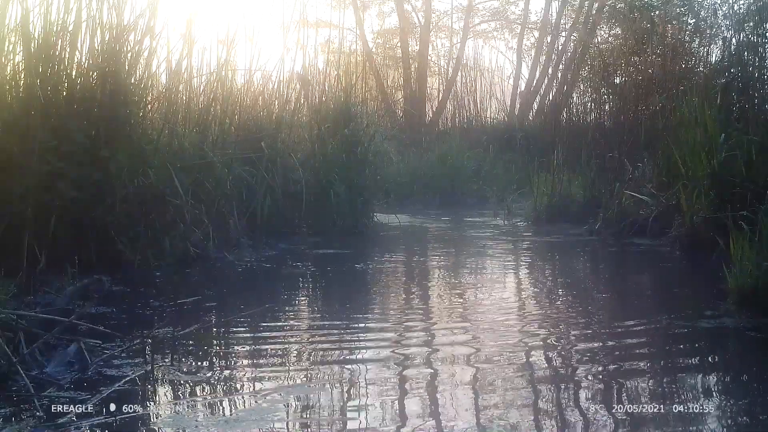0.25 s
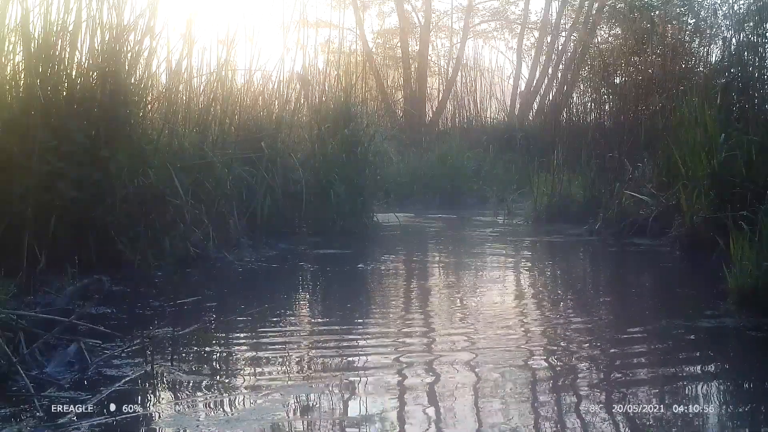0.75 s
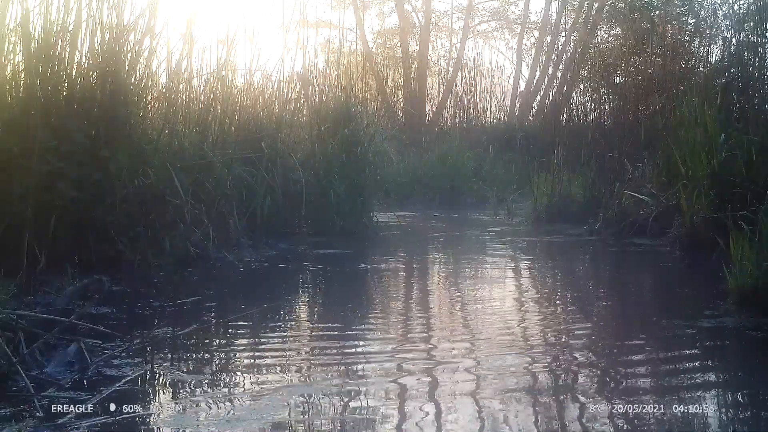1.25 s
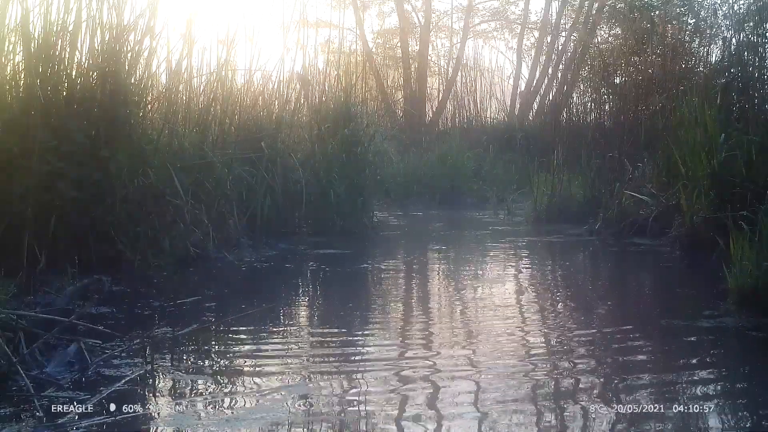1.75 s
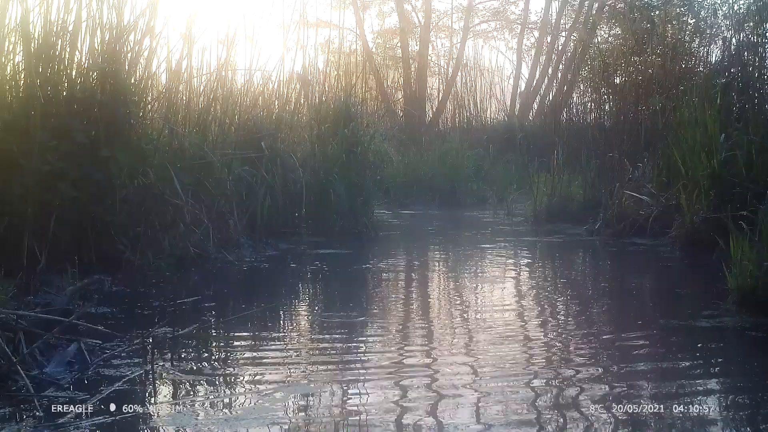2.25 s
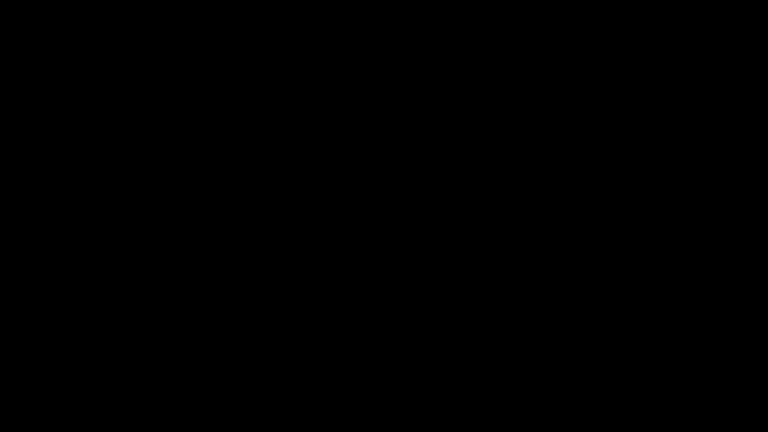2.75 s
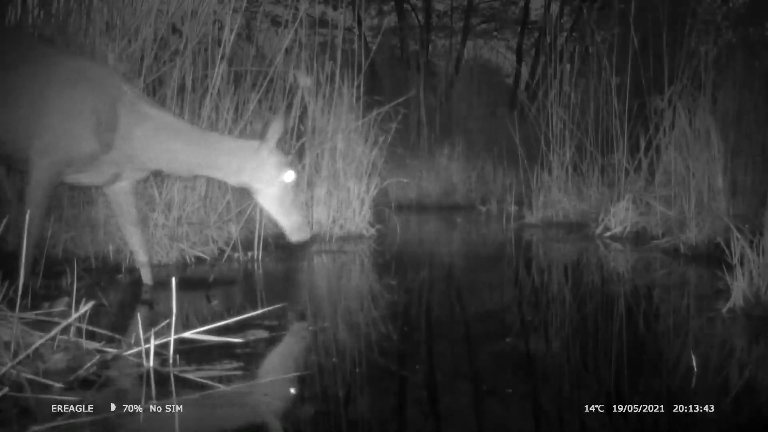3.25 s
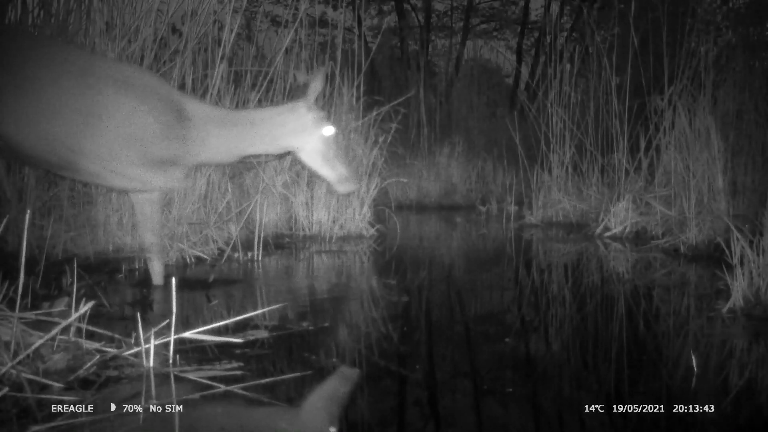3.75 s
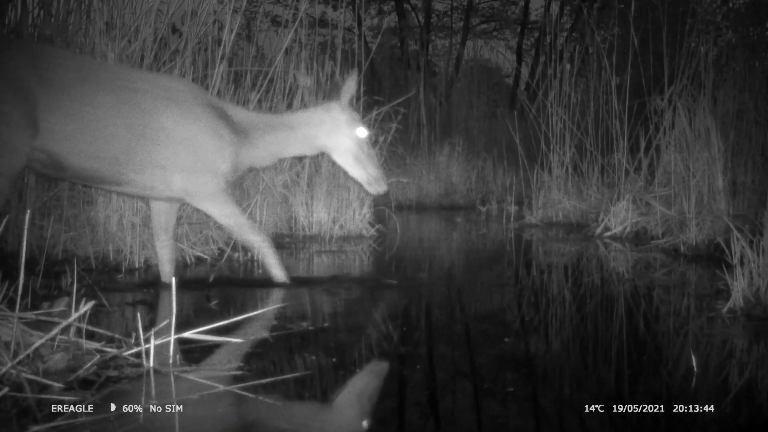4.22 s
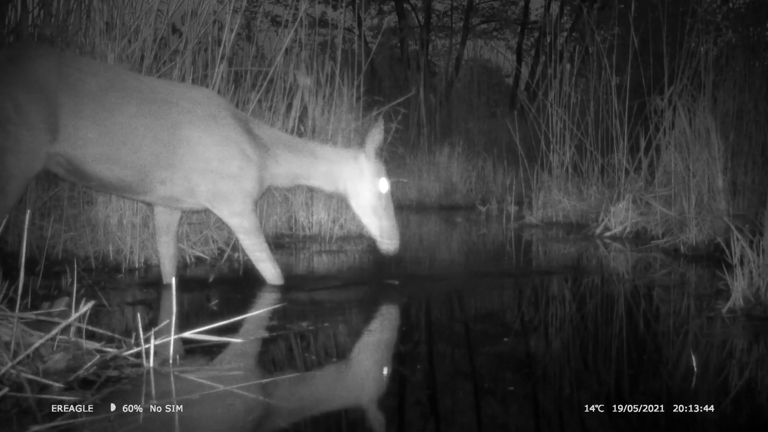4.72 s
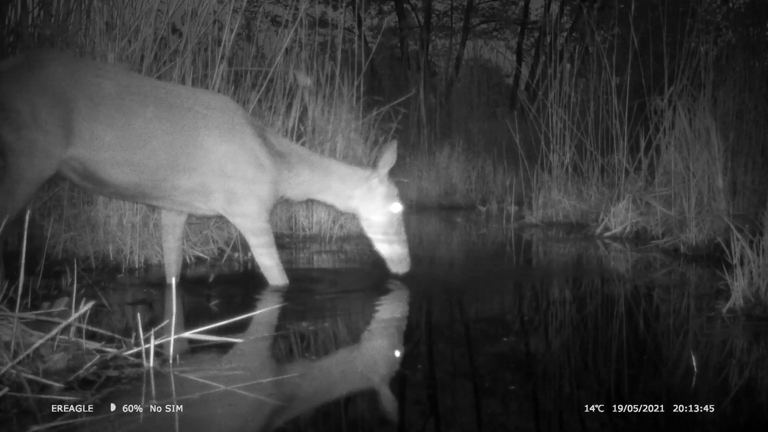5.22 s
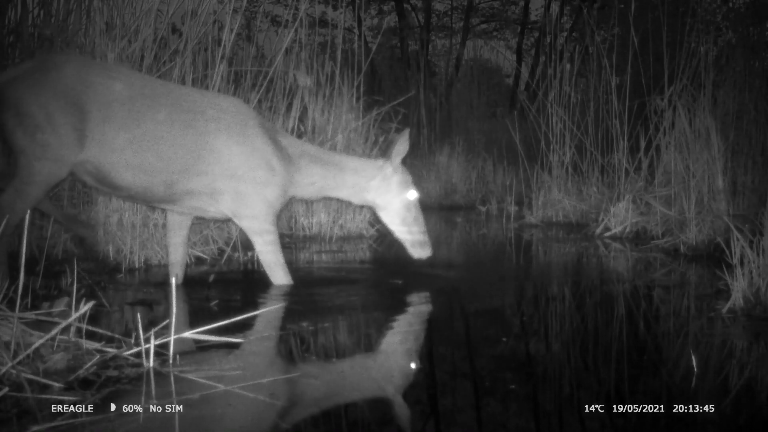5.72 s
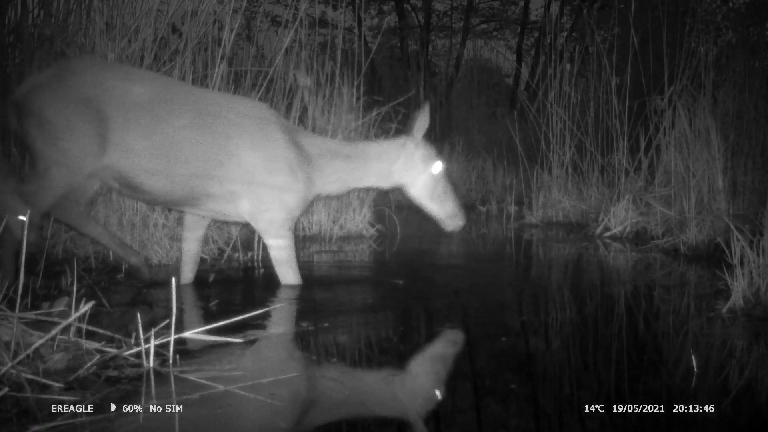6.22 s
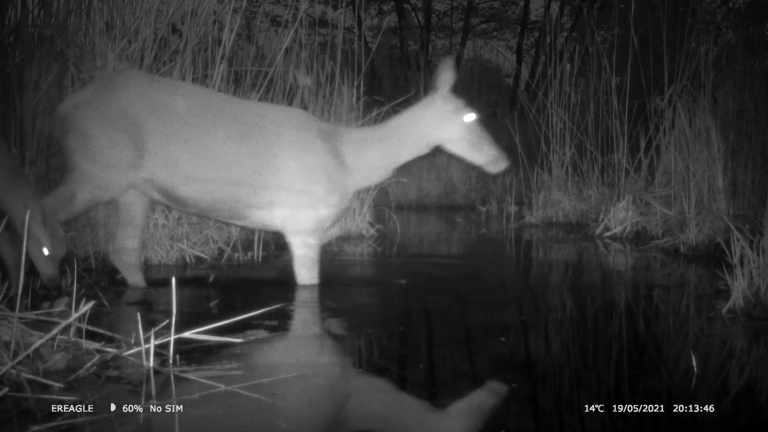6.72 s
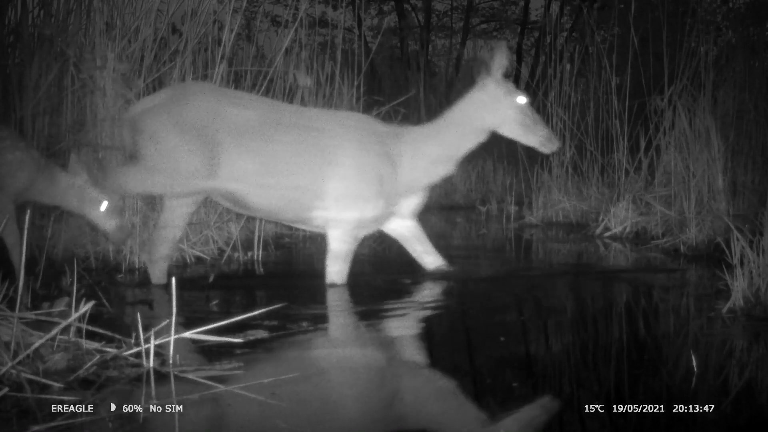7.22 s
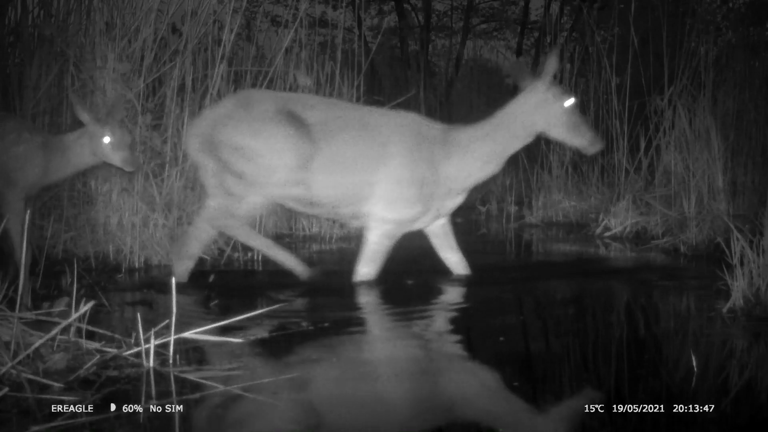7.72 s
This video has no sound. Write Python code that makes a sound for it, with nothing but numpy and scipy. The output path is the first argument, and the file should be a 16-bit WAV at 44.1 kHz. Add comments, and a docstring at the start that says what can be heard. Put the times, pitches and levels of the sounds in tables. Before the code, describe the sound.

Faint distant birds whistle over hiss at dawn, fade to silence, then a deer wades close by with plops, sharp splashes and drips over a low hum.

```python
'''Deer wading past a trail camera

Far birds whistle over a quiet dawn as gliding tones, then the sound fades through silence to night.
There a deer wades close by: swarms of ringing bubbles make the slosh and spray, noise bursts the slaps,
and single bubbles the plops and drips. Filtered noise gives the camera's hiss and a low rumble;
sine tones give its faint whine in both scenes and its hum at night.
'''
import sys
import numpy as np
from scipy import signal
from scipy.fft import rfft, irfft, next_fast_len
from scipy.io import wavfile
from scipy.ndimage import map_coordinates

SR = 44100
rng = np.random.default_rng(int(sys.argv[2]) if len(sys.argv) > 2 else 0)


def to_wav(sig):
    """Store sig (one row per channel, or 1-D mono) as 16-bit WAV at the path in sys.argv[1].

    Samples outside -1..1 are clipped; the rate is SR.
    """
    pcm = np.clip(np.atleast_2d(sig), -1, 1) * 32767
    pcm = np.round(pcm).astype(np.int16)
    wavfile.write(sys.argv[1], SR, pcm.T)  # frames by channels


N = 351477
TIME = np.arange(N) / SR
NIGHT_START_S = 2.865
TOP_HZ = 15600

# water stirred by the walking legs, swelling with each group of steps; levels before the layer trims:
# time_s, spray_db, slosh_db
WAKE = [(2.9, -71, -71.5), (3.42, -69, -70), (3.64, -58.5, -54), (3.78, -58.5, -69), (3.97, -54, -61),
        (4.15, -55, -66), (4.34, -69, -71.5), (6.4, -69.5, -76), (6.56, -58.5, -65), (6.66, -48.5, -46),
        (7.13, -46.5, -54.5), (7.33, -57.5, -54.5), (7.52, -55.5, -68), (7.8, -47, -60),
        (7.97, -55.5, -62.5)]
# a leg pushes through the surface; levels before the layer trims:
# full_strength_s, hold_s, spray_db, slosh_db
STROKES = [(3.394, .006, -55, -66), (3.503, 0.0087, -53, -56), (3.654, .008, -51.5, -47.5),
           (3.895, 0.018, -39.5, -69), (3.921, .008, -52, -50.5), (4.088, 0.0085, -43.5, -60),
           (5.296, .025, -62, -79), (5.607, .008, -65, -66), (5.835, 0.022, -59, -63),
           (6.64, 0.012, -44.5, -42.5), (6.845, .012, -41, -45), (6.896, 0.017, -37.5, -52),
           (7.012, 0.0075, -41, -43), (7.068, 0.023, -41.5, -47), (7.162, 0.022, -44.5, -48.5),
           (7.262, 0.0073, -51, -55), (7.433, .012, -48.5, -66), (7.717, 0.013, -43, -46),
           (7.797, 0.0085, -42, -40.5)]
# drops and sheets of water slapping the surface; level before the layer trims, hollow part relative to it:
# start_s, level_db, hollow_db
SLAPS = [(3.5062, -37.5, -14), (3.5435, -38, -26), (3.6798, -25.5, -12.5), (3.788, -36, -9),
         (3.818, -36, -18), (3.8511, -29, -33), (3.8773, -28, -33), (4.017, -27, -12.5),
         (4.0657, -31.5, -9), (4.2265, -36.5, -30), (4.2574, -34.5, -16.5), (6.225, -42.5, -26),
         (6.3579, -38, -33), (6.4506, -36.5, -16), (6.4682, -36, -24), (6.488, -39.5, -21),
         (6.57, -31, -10.5), (6.6474, -27, -9.5), (6.7022, -28.5, -14), (6.7998, -27.5, -27),
         (6.8317, -25.5, -26), (6.8882, -22, -18), (6.8988, -24, -11), (6.919, -32.5, 0.5),
         (7.008, -30.5, -11), (7.058, -32, -4), (7.1545, -33, 1), (7.166, -28.5, -25), (7.2665, -32, -9),
         (7.4278, -28, -33), (7.4368, -33, -11), (7.546, -36, -30), (7.6848, -21.5, -11.5),
         (7.7139, -29.5, -3), (7.7388, -29.5, -13), (7.796, -24, -13), (7.8491, -31, -30)]
# single large air pockets; level before the envelope and shake, pitch rise as a share of the pitch:
# start_s, pitch_hz, level_db, rise_share
POCKETS = [(2.965, 1250, -49, 0.87), (3.154, 2720, -44.5, .15), (3.591, 1940, -37.5, 0),
           (3.618, 1580, -36.5, 0.058), (3.78, 1285, -40, 0.11), (3.789, 2870, -33, 0.029),
           (3.912, 2010, -29.5, .3), (3.922, 1420, -32, 0.2), (3.987, 2100, -39, 0),
           (4.098, 1570, -37, 0.038), (4.388, 3150, -48.5, .1), (4.637, 1100, -51.5, 1.1),
           (5.468, 1240, -52, 0.1), (6.74, 660, -41.5, 0), (6.801, 1820, -32, 0), (6.81, 343, -46.5, 0.73),
           (6.832, 1940, -33, .6), (6.891, 1090, -35.5, 0.24), (6.92, 2880, -27, 0.54),
           (6.963, 1520, -36.5, .8), (7.01, 740, -40.5, 0.1), (7.024, 1510, -32, 0.34),
           (7.058, 880, -40, 0.1), (7.079, 1510, -36, 0.056), (7.132, 1260, -37, 0.35),
           (7.265, 1250, -37, 0.11), (7.278, 448, -46, 1.35), (7.354, 950, -44, 0.73),
           (7.437, 2245, -36, 0), (7.763, 680, -43, 0.39)]
# far bird notes; level before the tail is added:
# start_s, length_s, start_hz, end_hz, level_db, roughness (0-1)
BIRD_NOTES = [(0, 0.093, 3010, 3100, -70.5, 0.13), (.24, 0.099, 3350, 3480, -72, 0.2),
              (.52, 0.14, 3640, 3330, -70, 0.17), (.83, 0.12, 4240, 4300, -73, .08),
              (1, 0.18, 4310, 4300, -72.5, 0.17), (1.17, 0.18, 2470, 2550, -71.5, 0.05),
              (1.29, .19, 4290, 4290, -69.5, 0.08), (1.39, .13, 3380, 3280, -72.5, 0.2),
              (1.47, .05, 7600, 6650, -63, .6), (1.49, .12, 6750, 6600, -59.5, .6),
              (1.6, .2, 6600, 6500, -69, .6), (1.69, .12, 4200, 4260, -76, .15),
              (1.83, .1, 3720, 3600, -73, 0.2), (1.98, 0.17, 3640, 3600, -76, 0.2),
              (2.35, 0.58, 6500, 6620, -71, 0.64), (2.64, 0.16, 7600, 7500, -66, .3)]

# tone colours of the bright spray and the lower slosh, relative levels: freq_hz, level_db
SPRAY_COLOUR = [(900, -28), (2000, -20), (3250, -11.5), (4100, -11), (5300, -3.5), (6200, 1), (7300, -2.5),
                (8900, -11), (10400, -10.5), (12500, -18.5), (16000, -43)]
SLOSH_COLOUR = [(170, -20.5), (350, -11), (650, -7.5), (1100, -4.5), (1700, 1.5), (2300, -3), (3200, -3.5),
                (4500, -6.5), (8000, -29)]
# tone colours of the hiss and rumble at dawn and at night, relative levels: freq_hz, level_db
DAWN_HISS = [(88, -24), (150, 0), (308, -1.5), (550, -3), (656, -3.5), (1980, -5), (3480, -5), (7000, -6),
             (7860, -8), (14600, -8.5), (15500, -10)]
NIGHT_HISS = [(88, -39), (150, -3), (373, -6), (781, -8), (948, -9.5), (1290, -9.5), (1510, -11),
              (1660, -11), (3040, -13.5), (5030, -12.5), (6110, -11.5), (15500, -14.5)]
DAWN_RUMBLE = [(8, -17.5), (25, -2), (52, -2.5), (72, -7), (100, -16), (200, -25.5), (400, -42)]
NIGHT_RUMBLE = [(8, -12), (25, -4), (48, 5), (75, -1), (120, -8.5), (200, -24), (400, -41.5)]
# decay of the open air between the reed banks, and of the trees: freq_hz, t60_s
BANKS_DECAY = [(300, 0.07), (3000, 0.067), (12000, 0.18)]
WOODS_DECAY = [(2000, 1), (8000, 0.31)]

RISE_DB_PER_S, FALL_DB_PER_S = 434, 310  # how fast a stroke builds up and settles
SLAP_RING_HZ, SLAP_RING_SPREAD = 6400, 0.074  # the tiny bubble under a slap, and its scatter as a share
POCKET_CYCLES, POCKET_MAX_S = 17.5, .065  # low pockets ring longest, and rising ones last longer still


def amp(db):
    """Decibels to gain."""
    return 10 ** (np.asarray(db) / 20)


def unit(x):
    """Scale to rms 1."""
    return x / np.sqrt(np.mean(x ** 2) + 1e-20)


def along(points, hz):
    """Read a table of frequency and value on a log frequency axis."""
    freq_hz, value = np.transpose(points)
    return np.interp(np.log(hz + 1), np.log(freq_hz), value)


def wobble(rate):
    """A smooth random curve, rate knots a second."""
    knots = rng.standard_normal(int(N * rate / SR) + 4)
    fine = np.arange(4 * len(knots)) / 4
    return np.interp(TIME * rate, fine, map_coordinates(knots, [fine]))


def coloured(x, points):
    """Minimum-phase filter with the given tone colour: it is causal, so attacks stay sharp."""
    m = 2 * next_fast_len(len(x) // 2 + 2048)
    log_gain = np.log(amp(along(points, np.fft.rfftfreq(m, 1 / SR))))
    cepstrum = irfft(log_gain)
    # fold the cepstrum onto positive time
    cepstrum[1:m // 2] *= 2
    cepstrum[m // 2 + 1:] = 0
    response = np.exp(rfft(cepstrum))
    return irfft(rfft(x, m) * response, m)[:len(x)]


def noise(points):
    """Coloured noise of rms 1."""
    return unit(coloured(rng.standard_normal(N), points))


def add(track, s, sound):
    """Mix a sound into the track at time s."""
    i = max(0, round(s * SR))
    track[i:i + len(sound)] += sound[:max(0, N - i)]


def ping(t, hz, life, rise):
    """A bubble rings, dies away and climbs in pitch as it nears the surface."""
    u = np.minimum(t / life, 1)
    swell = (1 - np.exp(-12 * u)) * np.exp(-3 * u) * (1 - u ** 4)
    return swell * np.sin(2 * np.pi * hz * t * (1 + rise * u / 2))


def swarm(count, low_hz, high_hz, cycles, rise, spread_db, size):
    """Bubbles at random moments of the night scene, many weak and a few strong, size samples each; rms 1."""
    draws = rng.random((count, 5)).astype(np.float32)
    when, pitch, strength, damping, climb = draws.T[:, :, None]
    hz = low_hz * (high_hz / low_hz) ** pitch
    life = np.minimum(cycles * (damping + .5) / hz, size / SR)
    gain = amp(spread_db * np.minimum(-np.log(1.0001 - strength), 3))
    t = np.arange(size, dtype=np.float32) / SR
    grains = gain * ping(t, hz, life, 2 * rise * climb)
    start = np.interp(when, [0, 1], [NIGHT_START_S * SR, N]).astype(int)
    places = start + np.arange(size)
    return unit(np.bincount(places.ravel(), grains.ravel(), N)[:N])


def echo(x, decay):
    """Scattered reflections: a noise tail in which each frequency dies at its own speed."""
    hz, t, z = signal.stft(rng.standard_normal(SR // 2), SR, nperseg=256)
    fading = z * amp(-60 * t / along(decay, hz)[:, None])
    tail = signal.istft(fading, SR, nperseg=256)[1]
    return signal.fftconvolve(x, tail / np.linalg.norm(tail))[:N]


def wading(churn_db=-54):
    """Moving legs raise a crackling spray and a lower gurgle: single drops when gentle, a churn when strong."""
    spray_db, slosh_db = stir()
    busy = 1 / (1 + amp(churn_db - spray_db))  # half way at churn_db

    def blend(few, many):
        """Equal-power fade from sparse to dense bubbles."""
        return np.sqrt(1 - busy) * few + np.sqrt(busy) * many

    drops = swarm(count=5000, low_hz=2316, high_hz=12160, cycles=17.4, rise=0.094, spread_db=5.5, size=240)
    mist = swarm(count=10000, low_hz=1910, high_hz=13100, cycles=5.1, rise=0.063, spread_db=3, size=140)
    spray = unit(coloured(blend(drops, mist) + .5 * rng.standard_normal(N), SPRAY_COLOUR))

    gurgle = swarm(count=2400, low_hz=394, high_hz=3730, cycles=12.1, rise=0.22, spread_db=3.5, size=900)
    churn = swarm(count=4500, low_hz=335, high_hz=4260, cycles=6.9, rise=0.15, spread_db=3.5, size=520)
    thinned = np.diff(blend(gurgle, churn), prepend=0)  # differencing tilts it towards the treble
    slosh = unit(coloured(thinned, SLOSH_COLOUR)) + .5 * noise(SLOSH_COLOUR)

    clumps_db = 1.4 * wobble(170)  # water falls back in clumps
    return amp(spray_db + clumps_db - 2.5) * spray + amp(slosh_db + clumps_db - 4.5) * slosh


def stir():
    """Spray and slosh levels in dB: each stroke builds up, holds and settles on top of the wake."""
    s, *levels = np.transpose(WAKE)
    power = amp([np.interp(TIME, s, level) for level in levels]) ** 2
    for start, hold, spray_db, slosh_db in STROKES:
        before = np.maximum(start - TIME, 0)
        after = np.maximum(TIME - start - hold, 0)
        drop_db = RISE_DB_PER_S * before + FALL_DB_PER_S * after
        near = drop_db < 60
        power[:, near] += amp(np.array([[spray_db], [slosh_db]]) - drop_db[near]) ** 2
    return 10 * np.log10(power)


def slaps(burst_s=0.0046, fizz_s=0.021, fizz_db=-15, ring_s=0.0041, cavity_s=0.001315, crack_db=3,
          crack_s=.0007):
    """Falling water gives a crack, a short burst, a tiny ringing bubble and a fizz; its cavity sounds just after."""
    bright, hollow = np.zeros(N), np.zeros(N)
    t = np.arange(SR // 16) / SR
    burst = np.exp(-(t / burst_s) ** 2)
    fizz = amp(fizz_db) * np.exp(-t / fizz_s)
    crack = amp(crack_db) * np.exp(-t / crack_s)
    shape = burst + fizz + crack
    for s, db, hollow_db in SLAPS:
        ring_hz = SLAP_RING_HZ * np.exp(SLAP_RING_SPREAD * rng.standard_normal())
        high, low = shape * rng.standard_normal((2, len(t)))
        cavity_hz = 2400 * np.exp(0.258 * rng.standard_normal())
        high = coloured(high + 1.8 * ping(t, ring_hz, ring_s, 0.056), SPRAY_COLOUR)
        low = coloured(low + 1.3 * ping(t, cavity_hz, 0.011, 0.18), SLOSH_COLOUR)
        add(bright, s, amp(db) * unit(high))
        add(hollow, s + cavity_s, amp(db + hollow_db) * unit(low))
    return amp(-21.5) * bright + amp(-16.5) * hollow


def plops(shake_db=2.5, waver=.04):
    """Large pockets of air close behind the hooves; the moving water shakes their pitch and strength."""
    out = np.zeros(N)
    shake, bend = wobble(170), wobble(220)
    for s, hz, db, rise in POCKETS:
        life = min(POCKET_CYCLES * (1 + rise) / hz, POCKET_MAX_S)
        start = round(s * SR)
        span = slice(start, start + SR // 14)
        t = np.cumsum(1 + waver * bend[span]) / SR  # a wavering clock bends the pitch
        shaken_db = db + shake_db * shake[span] * np.minimum(t / .015, 1)
        add(out, s, amp(shaken_db) * ping(t, hz, life, rise))
    return out


def drips(count=70, low_hz=1000, high_hz=3600, db=-58, spread_db=3.0, cycles=24, rise=0.72):
    """Stray drops from the legs and muzzle plink into the stream, each a bubble with a small upward chirp."""
    out = np.zeros(N)
    t = np.arange(SR // 20) / SR
    for when, pitch, size, climb in rng.random((count, 4)):
        hz = low_hz * (high_hz / low_hz) ** pitch
        gain = amp(db - spread_db * np.log(max(1 - size, .05)))
        start_s = NIGHT_START_S + when * (N / SR - NIGHT_START_S)
        add(out, start_s, gain * ping(t, hz, cycles / hz, rise * climb))
    return out


def birds(flutter=0.0474):
    """Thin gliding whistles, some buzzed by fast pitch flutter, with a quick onset and a hazy tail from the trees."""
    out = np.zeros(N)
    tremble = wobble(650) + 0.406 * wobble(45)
    for s, length, start_hz, end_hz, db, rough in BIRD_NOTES:
        u = np.linspace(0, 1, int(length * SR))
        glide_hz = start_hz + (end_hz - start_hz) * u
        local = np.roll(tremble, -round(s * SR))[:len(u)]
        hz = glide_hz * (1 + flutter * rough * local)
        swell = np.minimum(1, np.minimum(20 * u, 2 * np.sqrt(1 - u)))
        add(out, s, amp(db) * swell * np.sin(2 * np.pi * np.cumsum(hz) / SR))
    return out + .75 * echo(out, WOODS_DECAY)


def hum(hz=46.64, waver_db=1.5):
    """The camera's low night-time hum: a steady sine and its octave, wavering in level and phase."""
    phase = 2 * np.pi * hz * TIME
    octave_gain = amp(-58.0 + waver_db * wobble(9.8))
    return amp(-46.5) * np.sin(phase) + octave_gain * np.sin(2 * phase + 0.27 * wobble(9))


def whine():
    """A faint high tone from the electronics, its pitch jittered until it turns fuzzy."""
    hz = 7912 + 25 * wobble(160)
    return amp(-76.5 + 3.0 * wobble(30)) * np.sin(2 * np.pi * np.cumsum(hz) / SR)


def scene():
    """Dawn fades out, night fades in."""
    water = wading() + slaps() + plops() + drips()
    water = water + amp(-14) * echo(water, BANKS_DECAY)
    dawn = birds() + amp(-61.5) * noise(DAWN_HISS) + amp(-64.0) * noise(DAWN_RUMBLE) + whine()
    night = water + hum() + amp(-61.5) * noise(NIGHT_HISS) + amp(-60.5) * noise(NIGHT_RUMBLE) + whine()
    fade_out = np.clip((NIGHT_START_S - TIME) / 0.2, 0, 1)
    fade_in = np.clip((TIME - NIGHT_START_S) / 0.2, 0, 1)
    return (fade_out * dawn + fade_in * night)[None]


def record(dry):
    """The camera keeps nothing above its band limit."""
    in_band = np.fft.rfftfreq(N, 1 / SR) < TOP_HZ
    return irfft(rfft(dry) * in_band, N)


dry = scene()
out = record(dry)
to_wav(out)
```